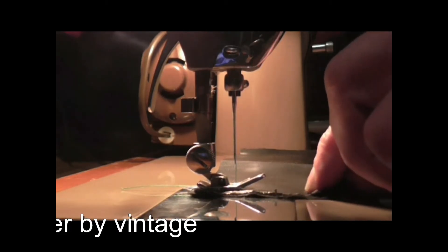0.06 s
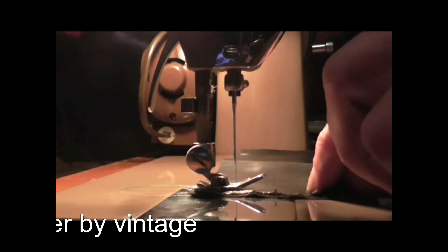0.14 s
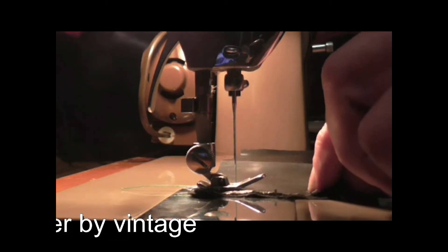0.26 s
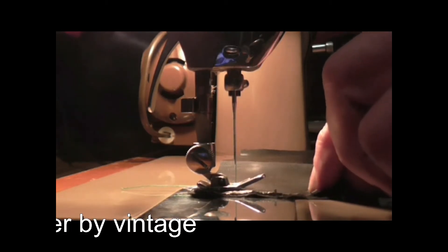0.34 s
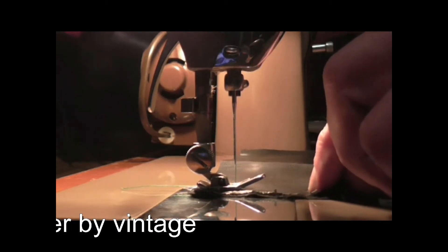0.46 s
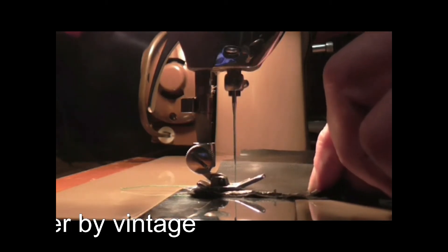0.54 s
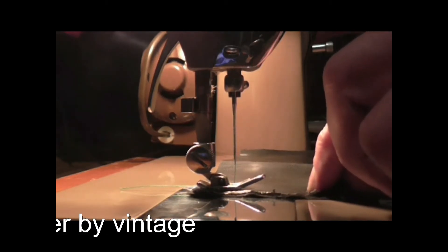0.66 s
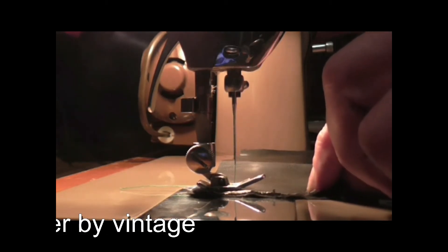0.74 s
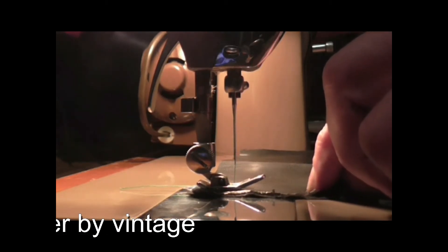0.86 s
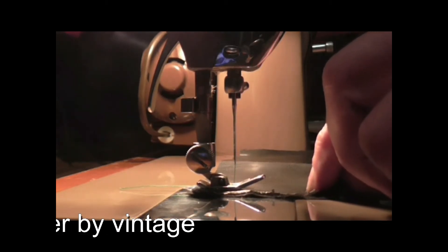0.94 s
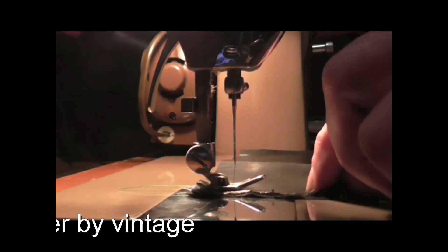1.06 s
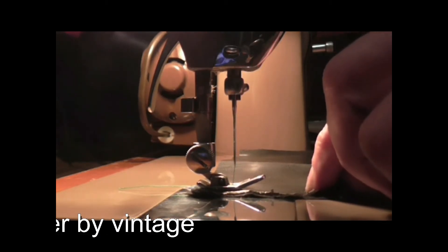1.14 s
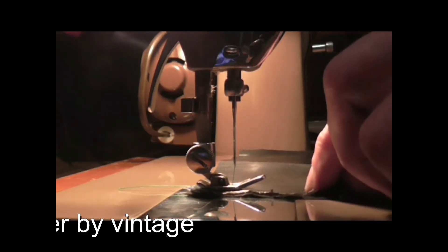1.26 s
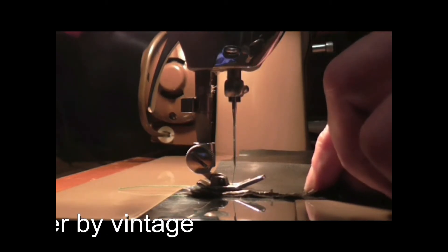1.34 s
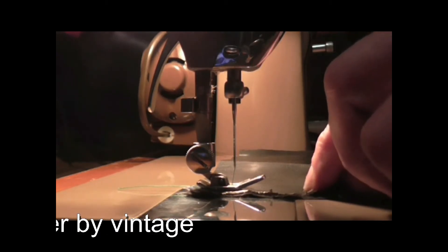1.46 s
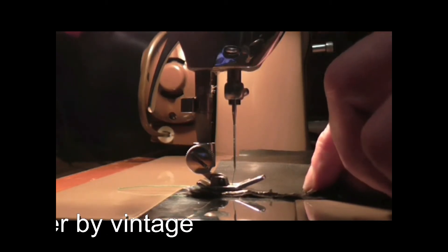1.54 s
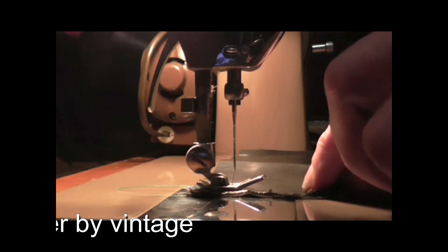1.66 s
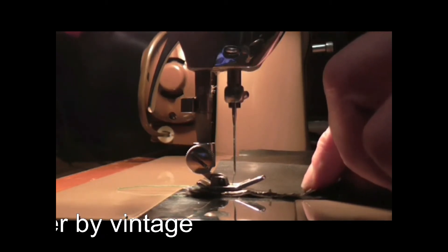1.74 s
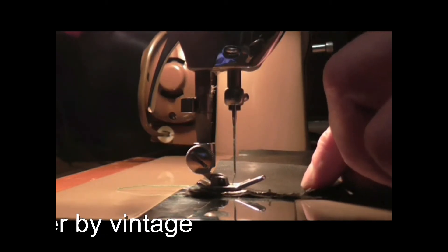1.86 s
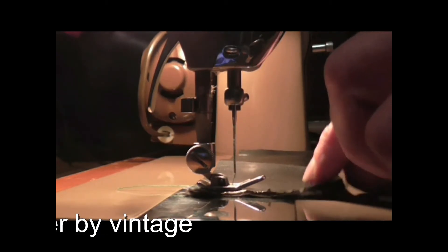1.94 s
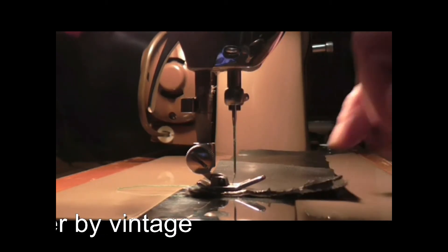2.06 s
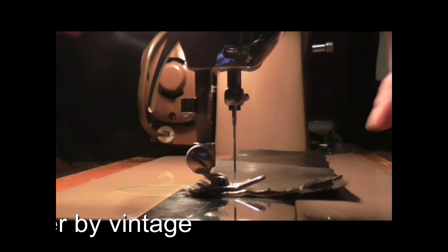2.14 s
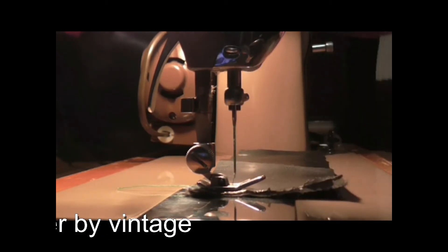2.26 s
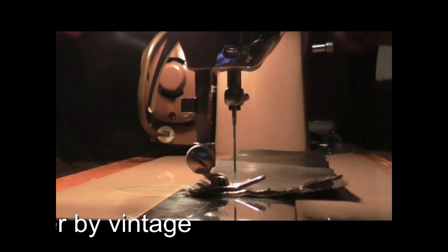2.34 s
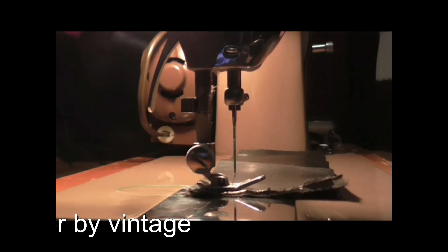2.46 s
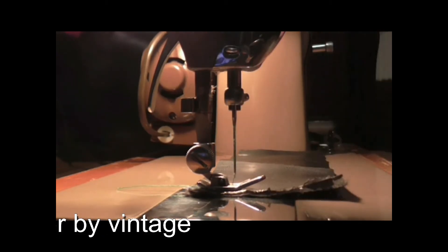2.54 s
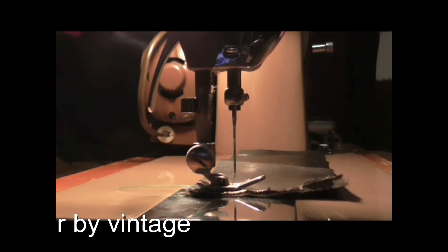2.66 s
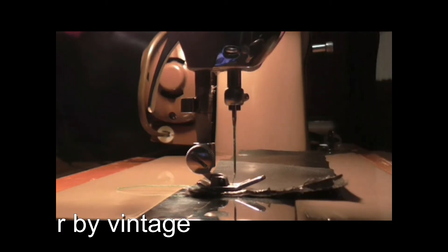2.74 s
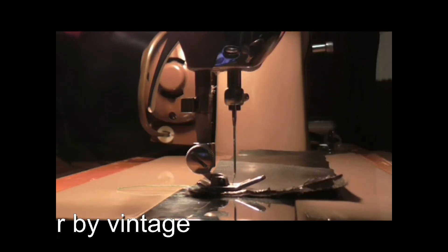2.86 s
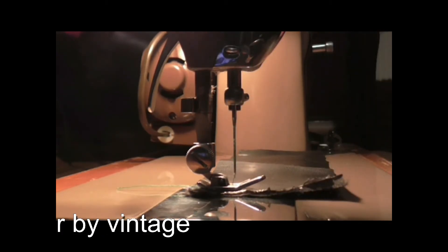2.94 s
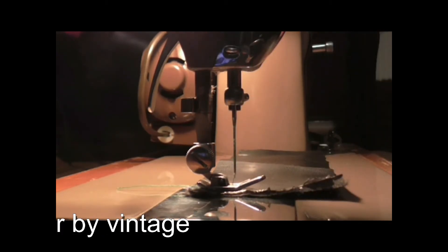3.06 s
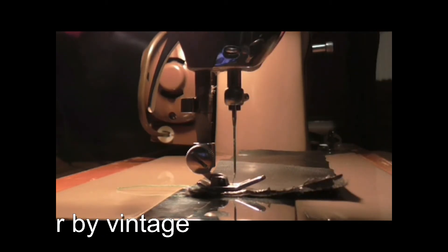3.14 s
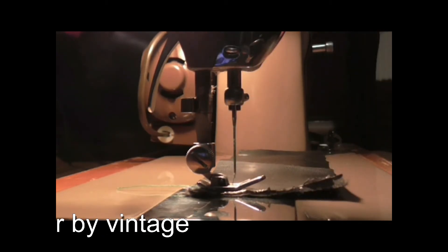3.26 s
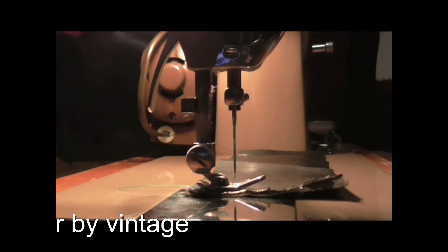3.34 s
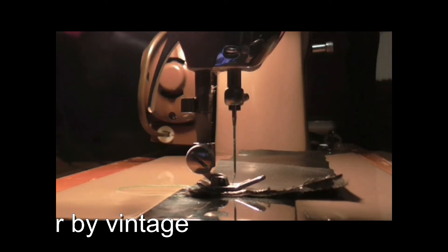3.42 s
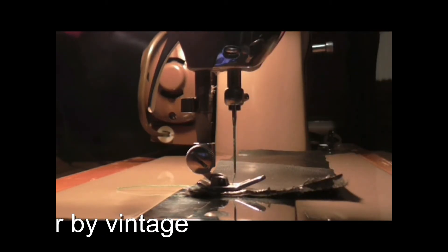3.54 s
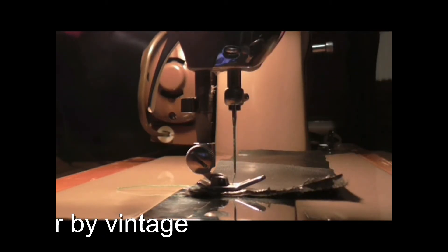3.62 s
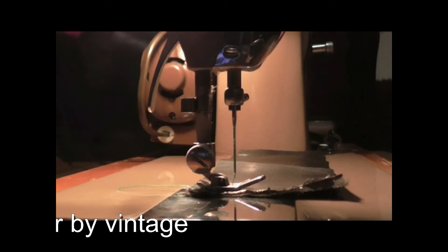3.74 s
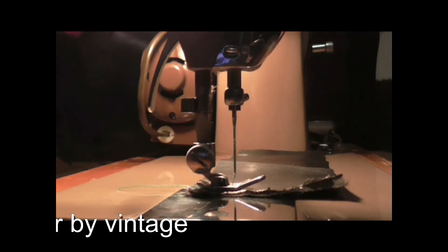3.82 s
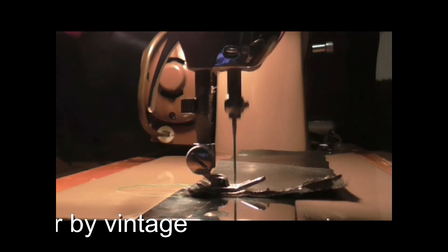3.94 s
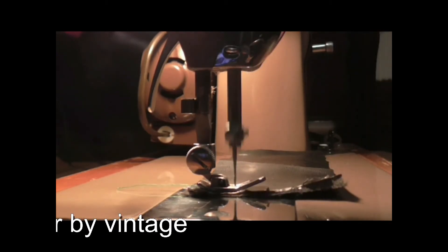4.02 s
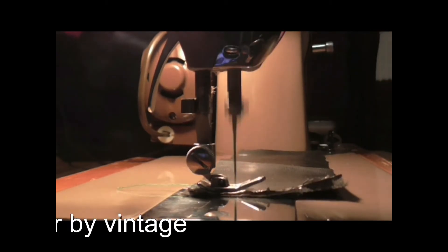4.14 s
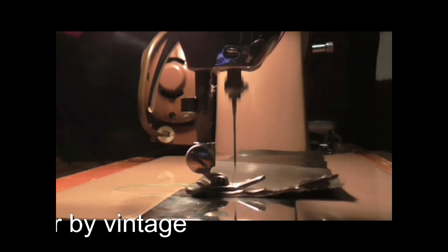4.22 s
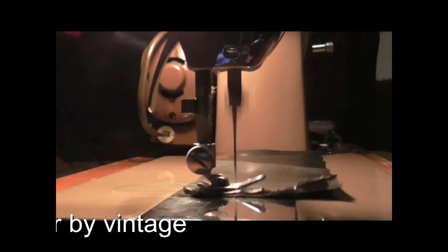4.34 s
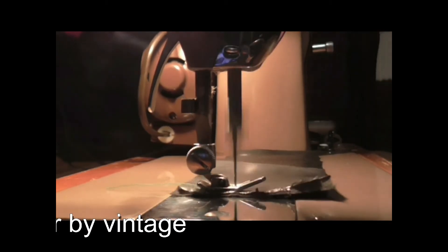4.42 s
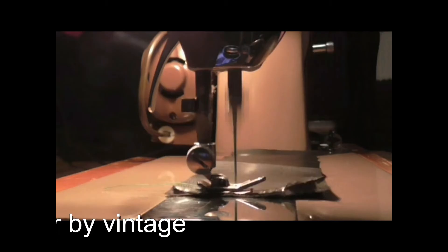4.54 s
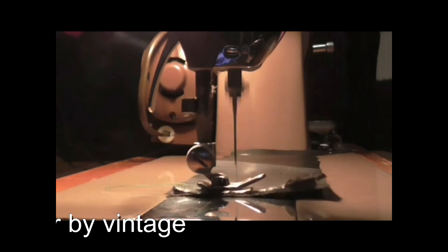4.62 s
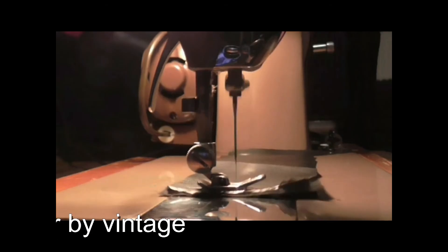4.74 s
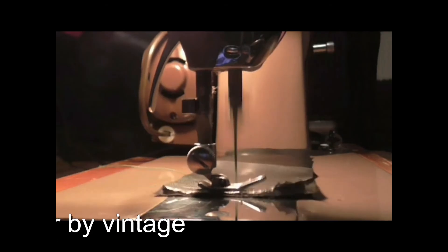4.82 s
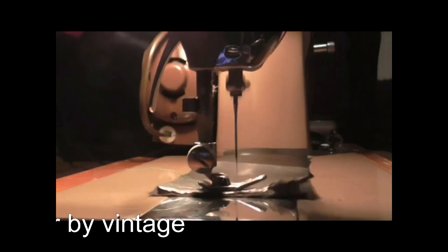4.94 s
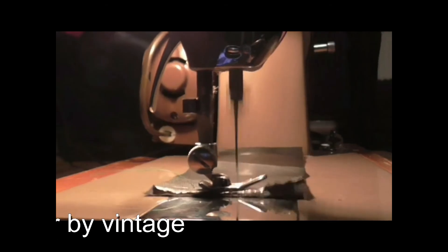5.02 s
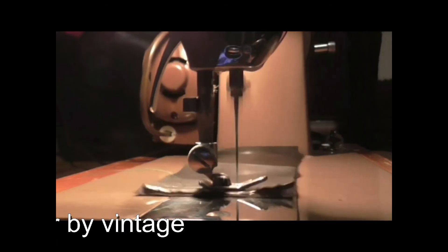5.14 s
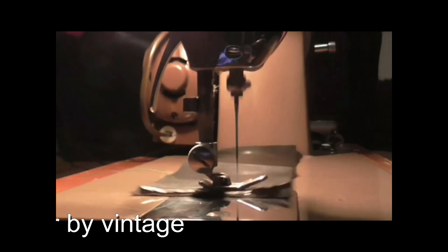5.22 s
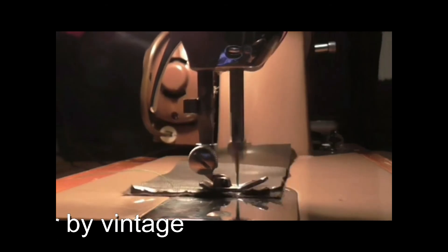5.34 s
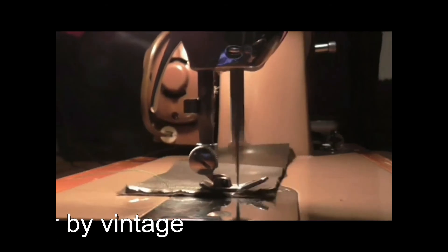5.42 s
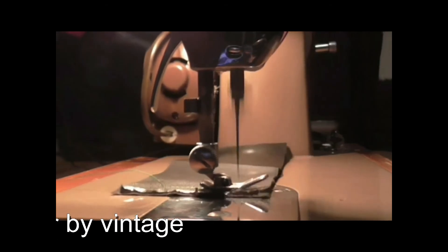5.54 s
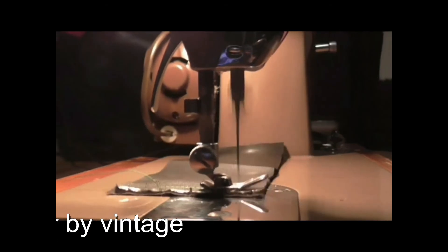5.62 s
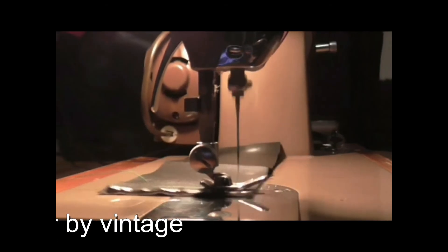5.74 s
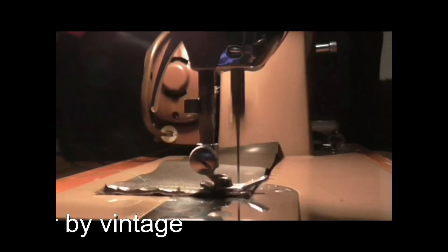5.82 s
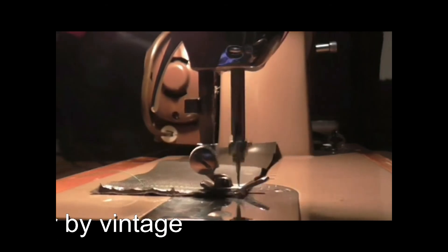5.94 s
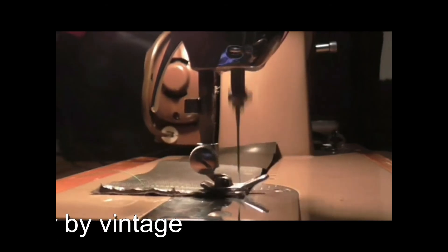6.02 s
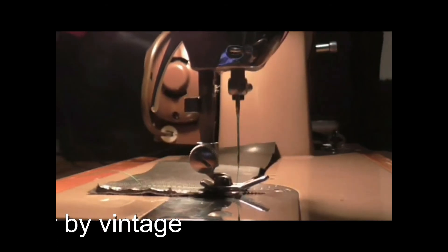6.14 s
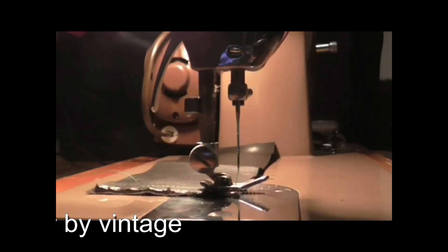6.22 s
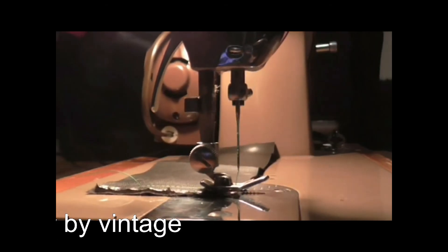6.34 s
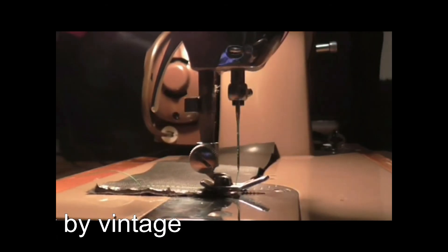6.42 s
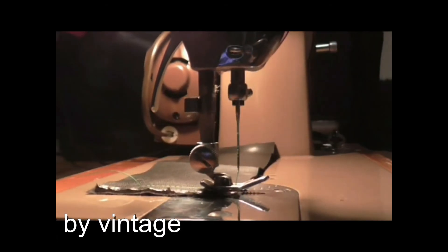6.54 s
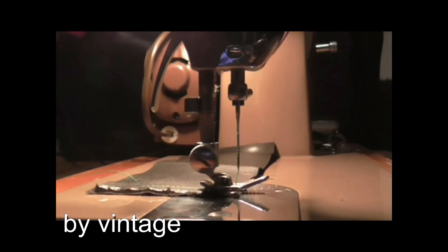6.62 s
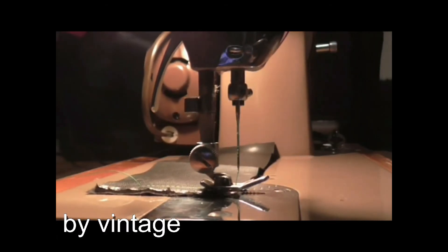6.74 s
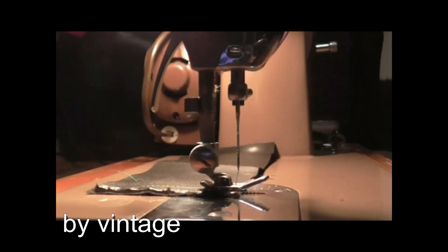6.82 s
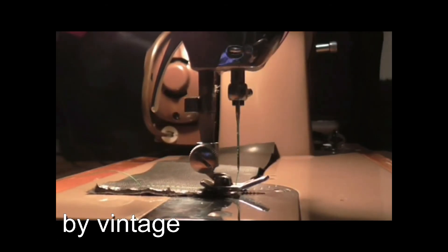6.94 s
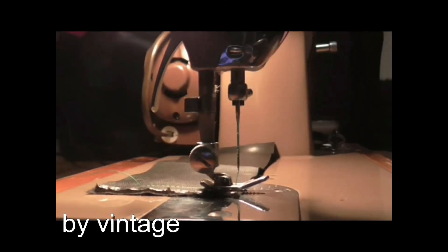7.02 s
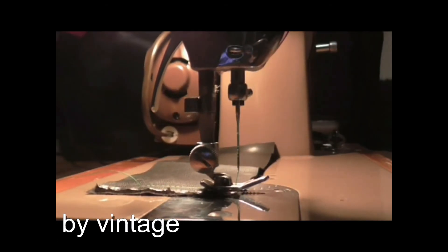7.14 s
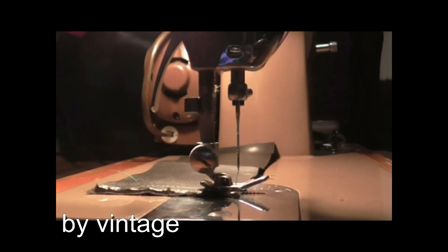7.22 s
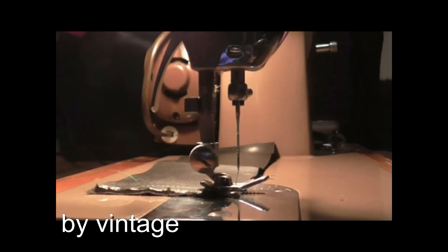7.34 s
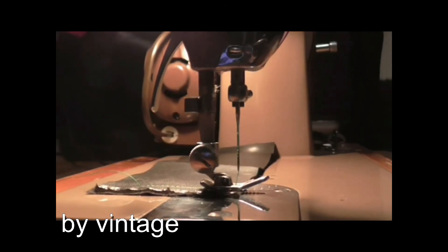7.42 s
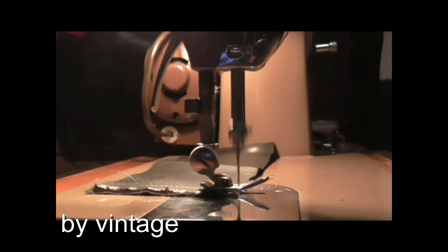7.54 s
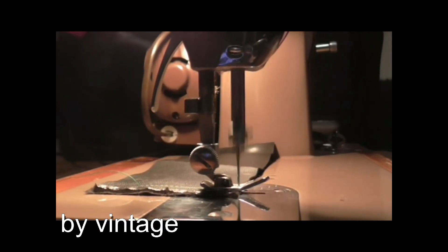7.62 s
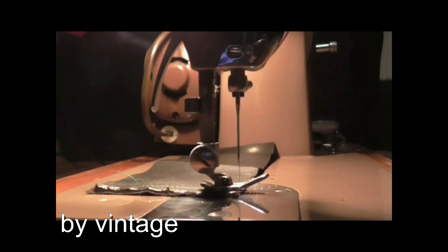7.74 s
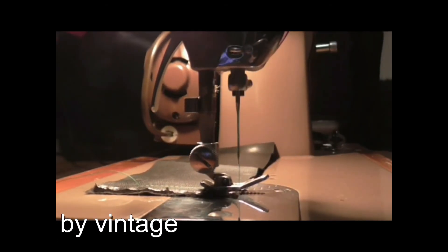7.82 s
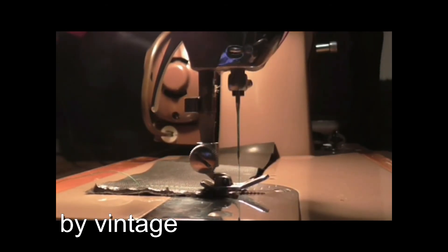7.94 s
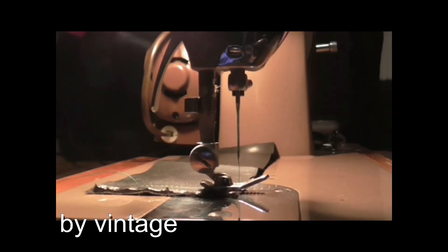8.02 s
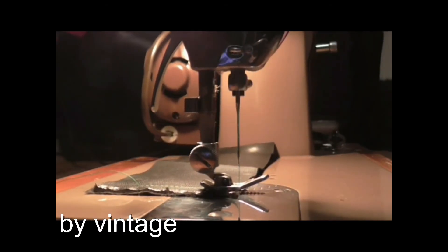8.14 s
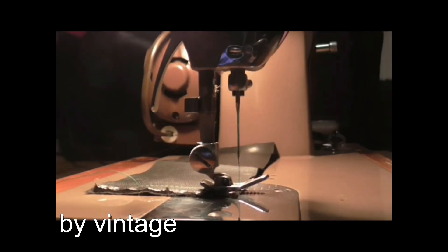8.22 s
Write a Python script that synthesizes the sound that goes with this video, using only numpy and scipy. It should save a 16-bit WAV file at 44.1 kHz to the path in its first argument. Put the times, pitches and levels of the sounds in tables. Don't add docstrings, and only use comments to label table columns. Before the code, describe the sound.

Faint handwheel rubs and plate rings, a pedal clack, then an electric sewing machine clatters through a two-second run, stops, and jerks through a short burst.

```python
import sys
import numpy as np
from scipy import signal
from scipy.fft import rfft, irfft
from scipy.io import wavfile
from scipy.ndimage import uniform_filter1d, map_coordinates

SR = 44100
rng = np.random.default_rng(int(sys.argv[2]) if len(sys.argv) > 2 else 0)


def gain_from_db(level_db):
    decades = np.asarray(level_db, float) / 20
    return 10 ** decades


def output_pcm(signal):
    pcm = np.clip(np.atleast_2d(signal).T, -1, 1) * 32767
    wavfile.write(sys.argv[1], SR, np.round(pcm).astype(np.int16))


N = 364707

# low_hz, high_hz, broad_fill_db, contact_length_s, contact_gain_db, left_right_likeness (-1..1),
# left_over_right_db, grain_db
PARTS = [
    (266, 827, -1.5, 0.0017, -2, 0.87, -2, -1.5),
    (823, 2640, -31.5, 0.0021, 0.5, 0.87, 0.5, 1),
    (2805, 7010, 7.5, 0.0034, -9, 0.74, -0.5, 1),
    (6700, 13900, 2.5, 0.0037, -7.5, 0.6, -1.5, 1),
    (927, 1600, -31, 0.0021, -10.5, 0.8, 6, 2),
]
# start_s, end_s, level_db, cover_ring_db (against the stroke)
STROKES = [
    (0, 0.102, -59.5, -6.5),
    (0.265, 0.423, -59.5, -7),
    (0.541, 0.708, -53.5, -9),
    (0.82, 0.983, -61, -9),
    (1.059, 1.297, -60.5, -9),
    (1.343, 1.613, -64, -18),
    (1.708, 1.868, -59.5, -9),
]
# start_s, descent_db, take_up_db, feed_db
STITCHES = [(3.93, .1, .1, .1), (4.177, .1, 14, -2), (4.375, 12, 7, 4.5), (4.524, 9, 0, -15),
            (4.649, 2.5, 4, -3), (4.771, 0, 8, 5.5), (4.871, -10, -0.5, -6), (4.97, 1, 7, -2),
            (5.066, -26, -4, -2), (5.157, -15, 6, 1.5), (5.247, -16, 0.5, 0.5), (5.335, -23, -2, 0),
            (5.419, -23, 0, 1), (5.503, 2, 5.5, 0), (5.587, 0, 4.5, -1), (5.67, 0.5, 4.5, 0.5),
            (5.758, -15.5, 4.5, 1.5), (5.871, -4, 3.5, -3), (6.043, .1, .1, -11), (6.328, .1, .1, .1)]


def rms_one(x):
    return x / np.sqrt(np.mean(x ** 2) + 1e-20)


def at_hz(points, hz):
    point_hz, value = np.transpose(points)
    return np.interp(np.log(hz), np.log(np.maximum(point_hz, 1)), value)


def band(x, low_hz, high_hz, order=2):
    edges_hz = [low_hz, min(high_hz, .45 * SR)]
    return signal.sosfilt(signal.butter(order, edges_hz, "band", fs=SR, output="sos"), x)


def drift(rate_hz):
    r = np.exp(-2 * np.pi * rate_hz / SR)
    return rms_one(signal.lfilter([1], [1, -2 * r, r * r], rng.standard_normal(N + SR))[SR:])


def stereo_noise(likeness):
    mid, side = rng.standard_normal((2, N))
    alike = np.clip(likeness, -1, 1)
    return np.sqrt((1 + alike) / 2) * mid + np.sqrt((1 - alike) / 2) * side * [[1], [-1]]


def resonate(x, modes):
    out = 0
    for k, (hz, width_hz, level_db) in enumerate(modes):
        r = np.exp(-np.pi * width_hz / SR)
        gain = gain_from_db(level_db) * (1 - r * r) / 2 * (-1) ** k
        out = out + signal.lfilter([gain, 0, -gain], [1, -2 * r * np.cos(2 * np.pi * hz / SR), r * r], x)
    return out


def struck(start_s, gains, length_s, rise_s=0.00042):
    clicks = np.full(N, 1e-9)
    np.add.at(clicks, (np.asarray(start_s) * SR).astype(int), gains)
    rise, decay = np.exp(-1 / (rise_s * SR)), np.exp(-1 / (length_s * SR))
    return signal.lfilter([1 - rise], np.convolve([1, -rise], [1, -decay]), clicks)


def knocked(blows, modes, length_s):
    start_s, level_db = np.transpose(blows)
    drive = struck(start_s, gain_from_db(level_db - 19.5), length_s) * rng.standard_normal(N)
    drive[(start_s * SR).astype(int)] += gain_from_db(level_db)
    return band(resonate(drive, modes), 130, 4300) / resonate(signal.unit_impulse(SR // 10), modes).max()


def background():
    # pitch_hz, density_db
    noise_spectrum = [(30, -36), (80, -15), (150, -8.5), (360, -6.5), (560, -7.5), (780, -13.5),
                      (1200, -16.5), (2200, -19.5), (2800, -26), (4600, -22.5), (6800, -29), (8000, -27),
                      (12800, -34.5), (15000, -41.5)]
    # pitch_hz, likeness (-1..1)
    noise_likeness = [(60, -0.47), (240, 0.11), (950, -0.18), (3770, 0.4), (15000, -0.062)]
    # pitch_hz, level_db (rms)
    hum_tones = [
        (100, -66.5),
        (7800, -82),
    ]
    noise_db = -59 + 2.5

    hz = np.maximum(np.arange(N // 2 + 1) * SR / N, 1)
    spectrum = [(30, -26.0), (80, -9.0)] + noise_spectrum[1:]
    mid, side = rfft(rng.standard_normal((2, N))) * gain_from_db(at_hz(spectrum, hz))
    alike = np.clip(at_hz(noise_likeness, hz), -1, 1)
    noise = irfft(np.sqrt(1 + alike) * mid + np.sqrt(1 - alike) * side * [[1], [-1]], N)
    t, tones = np.arange(N) / SR, 0
    for tone_hz, level_db in hum_tones:
        tones = tones + np.sqrt(2) * gain_from_db(level_db + 1.8 * drift(5)) * np.sin(2 * np.pi * tone_hz * t)
    return gain_from_db(noise_db) * rms_one(noise) * gain_from_db([[-.6], [.6]]) + tones * gain_from_db([[-1.2], [1.2]])


def handwheel():
    # pitch_hz, width_hz
    singing = [(640, 22), (2050, 250), (4650, 1000)]
    sing_db = [-1.5, -4.5, -2.5]

    t, tones, swell = np.arange(N) / SR, [], 0
    for hz, width_hz in singing:
        mode = [(hz, width_hz, 0)]
        tones.append(rms_one(resonate(resonate(stereo_noise(0.99), mode), mode)))
    for start_s, end_s, level_db, _ in STROKES:
        share = np.clip((t - start_s) / (end_s + 0.021 - start_s), 0, 1)
        swell = swell + gain_from_db(level_db) * np.sin(np.pi * share) ** .5
    return swell * sum(gain_from_db(level_db) * tone for level_db, tone in zip(sing_db, tones))


def time_of(turns):
    return map_coordinates(np.array(STITCHES)[:, 0], [turns], order=3, mode="nearest")


def sliding():
    # start_s, level_db
    motor_load = [
        [(3.89, -73), (3.93, -45.5), (3.99, -42), (4.09, -40.5), (4.16, -28.5), (5.02, -29.5), (5.9, -32),
         (6.07, -36), (6.2, -41.5), (6.32, -85)],
        [(7.38, -66), (7.494, -45), (7.532, -36), (7.64, -30), (7.718, -30.5), (7.828, -40), (7.892, -56.5),
         (7.96, -65)],
    ]
    # full_load_db, load_share, db_per_speed_doubling
    rubs = [(-31.5, 1.01, .3), (-32.5, .9, 1.2), (-28.5, .95, 5), (-34, .9, 9), (-36.5, 1.4, 1.5)]
    slack_db = [-4, -2, -1.5, 1.5, -0.5]
    stroke_rub_db = [-2, -12, -5, -9.5]
    full_load_db, full_stitches_per_s, burst_stitches_per_s = -31.5, 11.62, 2.94
    slack_turn, slack_width_turns = .83, 0.041

    t, stitch_s = np.arange(N) / SR, np.array(STITCHES)[:, 0]
    load_db = np.max([np.interp(t, *np.transpose(rows), -150, -150) for rows in motor_load], axis=0)
    load_db = load_db - full_load_db
    run_speed = np.interp(t, (stitch_s[1:] + stitch_s[:-1]) / 2, 1 / np.diff(stitch_s))
    speed = np.where(t < motor_load[1][0][0], run_speed, burst_stitches_per_s)
    doublings = np.log2(speed / full_stitches_per_s)
    turns = np.linspace(0, len(stitch_s) - 1, num=1000)
    phase = np.interp(t, time_of(turns), turns) % 1
    slack = np.exp(-.5 * ((phase - slack_turn) / slack_width_turns) ** 2)
    out = np.array([gain_from_db(full_db + share * load_db + speed_db * doublings + lift_db * slack)
                    for (full_db, share, speed_db), lift_db in zip(rubs, slack_db)])
    for start_s, end_s, level_db, ring_db in STROKES:
        stroke = np.clip(np.minimum((t - start_s) / 0.0087 + .5, (end_s - t) / 0.028 + .5), 0, 1)
        out += stroke * gain_from_db(level_db + np.array(stroke_rub_db + [ring_db]))[:, None]
    return out


def contacts():
    # turn_share, bed_db, arm_db, hook_db, needle_bar_db, cover_db
    cam_table = [(-.02, -15, -32, -27, -31, -24.5), (0.131, -37.5, -21.5, -21, -27, -26.5),
                 (.325, -19.5, -23, -43, -23, -15), (.49, -26, -21.5, -42, -32.5, -48),
                 (0.581, -10.5, -36, -23, -42, -29), (.67, -19, -33, -30, -44, -22),
                 (.79, -25, -30, -25, -46, -37)]
    cam_motion = [1, 1, 2, 2, 3, 3, 3]
    # start_s, level_db, sharpness_db
    knocks = [(0.31, -38.5, -18), (0.582, -32, 10), (1.885, -38, 8), (3.009, -30, -22), (3.954, -12, -15),
              (3.961, -14, -21), (4.161, -15, -6), (7.595, -11, -22), (7.63, -27, -8), (7.676, -16, 15)]
    # start_s, level_db, sharpness_db
    thuds = [(4.023, -10, 2), (4.08, -16, -1), (4.097, -13, 0.5), (4.172, -8.5, -0.5), (4.316, -8, 2),
             (6.034, -15, -7), (6.041, -13, -9), (6.127, -13.5, -2), (7.478, -20.5, 1), (7.56, -13.5, 2.5),
             (7.688, -15, 6.5)]
    # start_s, level_db, sharpness_db
    arm_clacks = [(.506, -31, -18), (1.693, -51.5, 9), (2.129, -59, 3), (3.373, -50, -8),
                  (3.775, -40, 12), (3.901, -36, -14), (3.911, -42, 11), (3.999, -20, 6.5),
                  (4.051, -17, -14), (4.129, -16.5, -17), (4.283, -21, 5), (7.428, -32, -29),
                  (7.622, -28, 14), (7.757, -22, -9), (7.771, -24, -10)]
    # start_s, level_db, sharpness_db
    hook_clicks = [(0.582, -19.5, -14), (0.613, -17.5, 9.5), (1.369, -37, .1), (0.678, -55, -0.5),
                   (1.479, -48, 15), (3.922, -22, 9), (4.044, -20, 5), (7.109, -42, -3), (7.44, -21, -3.5),
                   (7.479, -43, 12), (7.488, -35, 21)]
    # start_s, level_db, sharpness_db
    bright_ticks = [(4.197, -9, .1), (6.062, -16.5, 1), (7.713, -10.5, 0.12), (7.823, -25.5, 0.033)]
    # start_s, level_db, sharpness_db
    cover_rings = [(.89, -52, -10), (1.167, -26, 8), (1.236, -47, -2), (1.261, -41, -6), (1.304, -40.5, 3),
                   (1.366, -46, 4), (1.423, -40, -1), (1.502, -48, 10)]
    # start_s, level_db, sharpness_db
    body_slams = [(4.248, -8, -0.5), (6.125, -19, -5), (6.21, -34, 0.5), (7.574, -20, -0.5),
                  (7.721, -16.5, 0), (7.74, -18, 0), (7.805, -19.5, 2.5)]
    # bed_db, arm_db, hook_db, needle_bar_db, cover_db
    kind_drive = [
        (-2.5, -14.5, -27, -41, -26),
        (1.3, -11.5, -8.5, -17, -9),
        (-9, 2.8, -5, -27, -19.5),
        (-16.5, -10.5, -10, -43, -18),
        (-17.5, -5.5, -9, 0, -1.5),
        (-2.5, -19, -12.5, -28, 0.5),
        (0.5, -11.5, -3.5, -4, 0),
    ]
    sharpness_share = [0, 0.3, 0.99, 2, -0.53]
    # start_s, peak_db, bed_db, cover_db, arm_db
    accents = [(4.372, -7, -16.5, -17, -13.5), (4.425, -5.5, -44.5, -15, -20),
               (4.478, -7.5, -16.5, -27, -22), (4.521, 4, -19.5, -28, -39), (4.564, 3, -40, -15.5, -20),
               (4.589, -9, -44, -30, -40), (4.606, 5, -13.5, -44, -30), (4.648, -1, -18.5, -32, -21.5),
               (4.688, 9.5, -25, -10, -17), (4.738, -14, -18.5, -36, -35), (4.765, -21, -19, -39, -33),
               (4.8, -8, -31, -13, -26), (4.821, -0.5, -31, -24, 8), (4.867, 2, -16.5, -15.5, -36),
               (4.902, -15.5, -20, -22, -15), (4.927, -24, -30, -45, -31), (4.97, -20, -15.5, -34, -27),
               (4.999, -19, -16, -10, -31), (5.062, -25, -25, -30, -46), (5.079, -34, -28, -39, -41),
               (5.097, -32, -18, -16.5, -42), (5.156, -23, -13, -21.5, -13), (5.186, -25, -28, -12, -30),
               (5.25, -20, -20, -25, -12), (5.29, -17, -17, -34, -23), (5.33, -27, -22, -30, -24),
               (5.363, -19, -20, -22, -43), (5.416, -8, -14, -18, -26), (5.443, -17, -26, -22, -28),
               (5.498, -21, -23.5, -23, -16), (5.585, -12, -15.5, -23, -24), (5.668, -11.5, -16, -23, -22),
               (5.697, -21, -32, -25, -24), (5.751, -39, -18, -16, -27.5), (5.79, -17.5, -20.5, -11, -28),
               (5.869, -9.5, -15.5, -17, -33), (5.915, -13, -25, -8.5, -20.5), (5.948, -18, -26, -35, -45),
               (5.968, -7, -21.5, -16.5, -28)]
    accent_db = [5.5, -2, -22.5, -31, 0]
    # start_s, peak_db
    arm_taps = [(4.2294, -25), (4.3067, -21), (4.3894, -27), (4.4518, -30), (4.6369, -28), (4.706, -20),
                (5.1477, -32), (5.237, -15), (5.53, -39), (5.5944, -24), (5.6296, -36), (5.7146, -19),
                (5.809, -11), (5.888, -22), (5.9404, -22)]
    # start_s, peak_db
    needle_ticks = [(4.2655, -17), (4.376, -10.5), (4.3947, -22), (4.4265, -20), (4.5433, -22),
                    (4.6092, -18), (4.6668, -13), (4.8838, -20), (4.9845, -30), (5.032, -23), (5.1711, -29),
                    (5.2032, -26), (5.273, -18), (5.3472, -36), (5.5, -24), (5.6161, -25), (5.68, -22),
                    (5.775, -17), (5.8865, -17), (5.9386, -17.5), (5.9703, -20), (6.0377, -15), (6.126, -9)]
    arm_tap_db = [-39, -9.5, -32, -29, -31.5]
    needle_tick_db = [-38.5, -24.5, -26, -5, -40]
    cam_scatter_db, cam_play_s, cam_db, arm_most_db = 2, .001, -4.5, -15

    cams, stitch = np.array(cam_table), np.arange(2, len(STITCHES) - 2)[:, None]
    chance = rng.standard_normal((len(stitch) * len(cams), len(PARTS) + 1))
    cam_s = time_of((stitch + cams[:, 0]).ravel()) + cam_play_s * chance[:, 0]
    strength_db = np.array(STITCHES)[stitch, cam_motion][:, :, None] + cams[:, 1:]
    cam_level_db = strength_db.reshape(len(cam_s), -1) + cam_scatter_db * chance[:, 1:] + cam_db

    single = []
    kinds = [knocks, thuds, arm_clacks, hook_clicks, bright_ticks, cover_rings, body_slams]
    for rows, drive_db in zip(kinds, kind_drive):
        for start_s, level_db, sharp_db in rows:
            single.append((start_s, level_db + np.array(drive_db) + sharp_db * np.array(sharpness_share)))
    for start_s, peak_db, bed_db, cover_db, arm_db in accents:
        blow_db = [bed_db, min(arm_db, arm_most_db), peak_db, peak_db, cover_db]
        single.append((start_s, np.add(blow_db, accent_db)))
    for rows, drive_db in [(arm_taps, arm_tap_db), (needle_ticks, needle_tick_db)]:
        single += [(start_s, np.add(peak_db, drive_db)) for start_s, peak_db in rows]
    hit_s = np.append(cam_s, [start_s for start_s, _ in single])
    return hit_s, np.vstack([cam_level_db, [level_db for _, level_db in single]])


def machine(rubbing):
    # pitch_hz, width_hz, level_db
    bed_modes = [(380.3, 78.4, 0.5), (411.6, 57, 10), (467.4, 60, -3), (588, 18.4, 2), (620, 7.3, 3),
                 (811, 8, 5)]
    # pitch_hz, width_hz, level_db
    arm_modes = [(1314, 466, -0.5), (1730, 106, 7), (2030, 146, 2)]
    # pitch_hz, width_hz, level_db
    hook_modes = [(3890, 410, -5.5), (4433, 1040, 17.5), (4475, 1260, 10.5), (6540, 320, -9)]
    # pitch_hz, width_hz, level_db
    needle_bar_modes = [(8410, 600, 9), (7310, 1400, 9.5), (10250, 350, -2), (12900, 240, -11),
                        (14000, 800, -12), (15300, 900, -15.5)]
    # pitch_hz, width_hz, level_db
    cover_modes = [(1100.3, 63, 26.9), (1155, 53, 26)]
    rattle_rise_s = [0.002, 0.002, 0.0003, 0.00026, 0.01]
    blow_db = [-8, -3, -14, -14.5, -7.5]
    treble_left_db = 10.5

    hit_s, hit_db = contacts()
    out, shared, signs = 0, drift(27.6), rng.choice([-1, 1], len(hit_s))
    for k, modes in enumerate([bed_modes, arm_modes, hook_modes, needle_bar_modes, cover_modes]):
        low_hz, high_hz, fill_db, length_s, rattle_db, likeness, pan_db, grain_db = PARTS[k]

        def part(x):
            body = resonate(x, modes) + gain_from_db(fill_db) * band(x, low_hz, high_hz)
            return band(body, low_hz, high_hz, order=3)

        white = stereo_noise(likeness)
        chatter = gain_from_db(grain_db * (0.92 * shared + drift(86)))
        rattle = struck(hit_s, gain_from_db(hit_db[:, k] + rattle_db), length_s, rattle_rise_s[k])
        drive = white * (rubbing[k] * rms_one(chatter) + rattle) / part(white[0, :SR]).std()
        blows = np.zeros(N)
        blows[(hit_s * SR).astype(int)] = signs * gain_from_db(hit_db[:, k] + blow_db[k])
        blows /= np.abs(part(signal.unit_impulse(SR // 10))).max()
        out = out + part(drive + blows) * gain_from_db([[pan_db / 2], [-pan_db / 2]])
    return out + band(out, 13000, 17000) * (gain_from_db([[treble_left_db], [-treble_left_db]]) - 1)


def table_top(rubbing):
    # pitch_hz, width_hz, level_db
    table_modes = [(66.5, 99, -8.5), (122, 11, -0.5), (161.1, 21.6, 1.5), (201, 25, 2), (251, 72, -4)]
    # start_s, level_db
    jolts = [
        (0.611, -53),
        (1.89, -42),
        (3.004, -40),
        (3.915, -33),
        (3.953, -17.5),
        (4.021, -29),
        (6.122, -40),
        (7.476, -24),
    ]

    def shake(x):
        return band(resonate(x, table_modes), 40, 340, order=3)

    white, (start_s, level_db) = stereo_noise(-0.28), np.transpose(jolts)
    drive = gain_from_db(-4.0 + 0.86 * drift(29.9)) * rubbing[0] + struck(start_s, gain_from_db(level_db - 5.5), 0.029)
    return shake(white * drive) / shake(white).std()


def loose_plate():
    # pitch_hz, width_hz, level_db
    plate_modes = [(652, 29, -0.5), (1115, 16, 8), (1597, 300, -15)]
    # start_s, level_db
    touches = [(.01, -57), (.3, -55), (.315, -57), (.33, -65), (.65, -47), (.675, -43), (.69, -57),
               (.888, -49), (.905, -69), (.94, -58), (.955, -45), (.99, -73), (1.168, -32.5), (1.178, -50),
               (1.2, -60), (1.238, -55), (1.262, -52), (1.307, -40.5), (1.369, -41), (1.424, -45),
               (1.505, -36), (6.19, -33), (6.21, -32.5), (7.562, -18), (7.69, -14.5)]
    return knocked(touches, plate_modes, 0.0036)


def whines():
    # start_s, pitch_hz, level_db
    motor_whine = [(4.25, 1953, -36), (4.65, 1996, -29), (4.899, 1940, -34.5), (5.118, 1940, -28),
                   (5.452, 2101, -29), (5.66, 2170, -38.5), (5.782, 1946, -37), (6.0, 1970, -41)]
    # start_s, length_s, pitch_hz, level_db
    squeaks = [
        (1.573, 0.054, 5000, -63),
        (2.12, 0.037, 5000, -62),
        (2.475, 0.032, 5500, -65),
        (7.37, 0.1, 1600, -51),
        (7.492, 0.08, 270, -33),
        (7.601, 0.041, 450, -22.5),
        (7.667, 0.037, 440, -23.5),
    ]

    t, (start_s, hz, level_db) = np.arange(N) / SR, np.transpose(motor_whine)
    gain = gain_from_db(np.interp(t, start_s, level_db, -120, -120))
    out = gain * drift(88) * np.sin(2 * np.pi * np.cumsum(np.interp(t, start_s, hz)) / SR)
    for squeak_s, length_s, squeak_hz, squeak_db in squeaks:
        swell = np.sin(np.pi * np.clip((t - squeak_s) / length_s, 0, 1))
        out += gain_from_db(squeak_db) * swell * np.sin(2 * np.pi * squeak_hz * t)
    return out


def pedal():
    # start_s, level_db, upper_modes_db, bright_edge_db (last two against the clack)
    bounces = [(3.007, -27.5, -20, -24), (3.614, -24.5, 8, -18.5), (3.621, -16.5, 3, -25.5),
               (3.630, -30, -13, -16), (3.643, -30, -8, -34), (3.653, -38, 0, -30), (3.683, -35, 5, -26),
               (3.774, -38, 8, -12), (3.794, -34.5, 5, -20), (7.182, -33, 11, -21),
               (7.188, -17.5, 8.5, -19), (7.199, -31, 8, -16), (7.204, -19, 1.5, -14.5),
               (7.213, -23, 3, -27), (7.236, -49, 5, -26), (8.1294, -19.5, 10.5, -18),
               (8.133, -17.5, 7.5, -21), (8.139, -18.5, -25, -19.5), (8.154, -34, 4, -16),
               (8.165, -25, -7, -21)]
    # pitch_hz, width_hz, level_db
    press_low = [(555, 110, -5.5), (710, 150, -1.5), (990, 94, -5), (1300, 110, -2)]
    # pitch_hz, width_hz, level_db
    press_high = [(1530, 300, -3), (1844, 110, -2.5), (2020, 110, -0.5)]
    # pitch_hz, width_hz, level_db
    later_low = [(313, 35, -11), (573, 79, -6), (693, 50, 1.5), (818, 50, -2), (1012, 103, -4.5),
                 (1253, 60, -4)]
    # pitch_hz, width_hz, level_db
    repress_high = [(1230, 160, -3), (1500, 170, -3), (1700, 140, 1), (1897, 120, -1)]
    # pitch_hz, width_hz, level_db
    release_high = [(1415, 120, -6), (1606, 210, 2), (1838, 150, 1.5), (1970, 120, -9.5)]
    press_end_s, repress_end_s, off_db = 4.5, 8.0, -200

    s, level_db, upper_db, edge_db = np.transpose(bounces)
    white, signs, out = rng.standard_normal((3, N)), rng.choice([-1, 1], len(s)), 0
    first = np.where(s < press_end_s, 0, off_db)
    later = np.where(s < press_end_s, off_db, 0)
    second = np.where(s < repress_end_s, later, off_db)
    last = np.where(s < repress_end_s, off_db, 0)
    high_db = level_db + upper_db
    shells = [(press_low, level_db + first), (press_high, high_db + first), (later_low, level_db + later),
              (release_high, high_db + last), (repress_high, high_db + second)]
    for k, (modes, strike_db) in enumerate(shells):
        rattle = struck(s, gain_from_db(strike_db - 24.5), 0.0025) + struck(s, gain_from_db(strike_db - 38), 0.014)
        blows = white[k % 2] * rattle
        blows[(s * SR).astype(int)] += signs * gain_from_db(strike_db - 16.5)
        peak = resonate(signal.unit_impulse(SR // 10), modes).max()
        out = out + band(resonate(blows, modes), 190, 2490) / peak
    bright_db = level_db + edge_db
    edge = struck(s, gain_from_db(bright_db - 2.0), 0.0054) + struck(s, gain_from_db(bright_db - 20.0), 0.049)
    out = out + rms_one(band(white[2], 2100, 5960, order=3)) * edge
    return out + gain_from_db(-9) * rms_one(band(white[2], 6100, 11000)) * edge


def frame():
    # pitch_hz, width_hz, level_db
    frame_modes = [(301.7, 49, -3), (640, 190, -5.5), (778, 66, -1.5), (936, 80, -5.5), (1230, 42, -8.5),
                   (1340, 180, -8)]
    # start_s, level_db
    frame_hits = [(3.009, -41), (3.013, -47), (3.022, -45), (3.04, -47.5), (3.06, -48), (3.085, -52),
                  (7.716, -21), (7.723, -12), (7.741, -12), (7.747, -11.5), (7.758, -22), (7.771, -31),
                  (7.808, -18), (7.826, -46)]
    return knocked(frame_hits, frame_modes, 0.0035)


def room(x):
    t60_s, dull_hz = 0.46, 5000
    t = np.arange(int(.7 * SR)) / SR
    noise = stereo_noise(0.55)[:, :len(t)] * (t > .006)
    dull = band(noise, 101, dull_hz) * gain_from_db(-60 * t / t60_s)
    echo = dull + 3.3 * noise * gain_from_db(-60 * t / (0.28 * t60_s))
    return signal.fftconvolve(x[None], echo / np.sqrt(np.sum(echo ** 2) / 2), axes=1)[:, :N]


def scene():
    rubbing = sliding()
    sewing = machine(rubbing) + handwheel() + whines()
    clacks = pedal()
    sewing += loose_plate() * gain_from_db([[1.5], [-1.5]]) + frame()
    wet = room(gain_from_db(-13) * sewing.mean(axis=0) + gain_from_db(-10.0) * clacks)
    return sewing + table_top(rubbing) + clacks * gain_from_db([[-1.5], [1.5]]) + wet + background()


def masked(x):
    # pitch_hz, level_db
    faintest = [(2250, -70), (2500, -41), (3300, -42), (3800, -62), (8400, -58), (9300, -43), (13000, -44),
                (14200, -42.5)]
    frame_samples, lead_samples = 2048, 451
    loud_db, stricter_share, waver_db = -23, .16, 2.5

    shape = dict(fs=SR, window="cosine", nperseg=frame_samples)
    hz, _, lines = signal.stft(np.pad(x, ((0, 0), (lead_samples, 0))), **shape)
    power = np.mean(np.abs(lines) ** 2, axis=0)
    total = power.sum(axis=0)
    whole = total * (total / gain_from_db(2 * loud_db)) ** stricter_share
    waver = waver_db * rng.standard_normal((len(hz) // 16 + 1, len(whole)))[np.arange(len(hz)) // 16]
    treble = (hz > faintest[0][0])[:, None]
    least = gain_from_db(2 * (at_hz(faintest, hz + 1)[:, None] + waver)) * treble * whole
    kept = lines * (uniform_filter1d(power, size=3, axis=0) > least)
    return signal.istft(kept, **shape)[1][:, lead_samples:lead_samples + N]


def low_pass(x):
    return signal.sosfilt(signal.butter(12, 16180, fs=SR, output="sos"), x)


def record(dry):
    return low_pass(masked(dry))


dry = scene()
out = record(dry)
output_pcm(out)
```